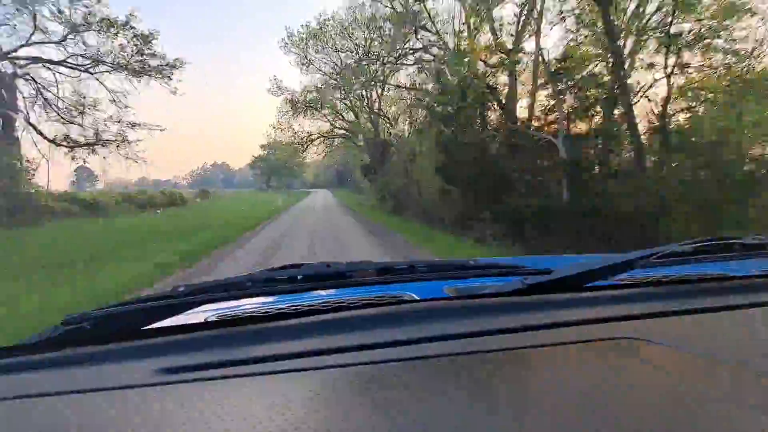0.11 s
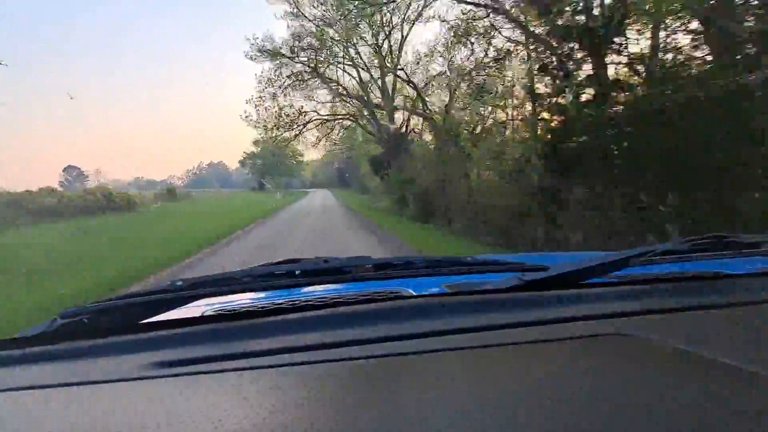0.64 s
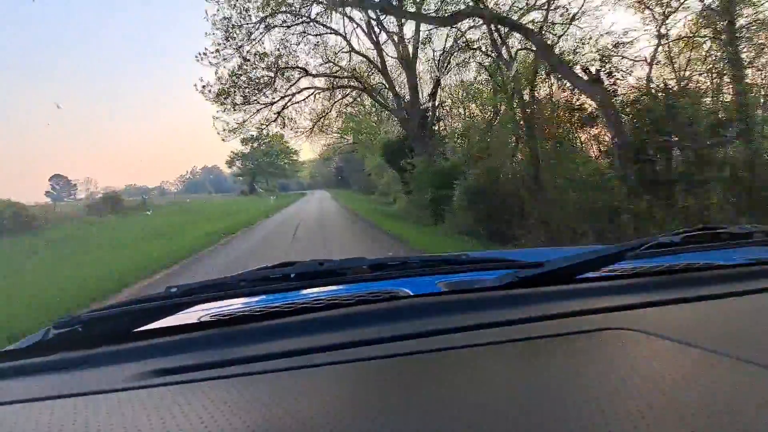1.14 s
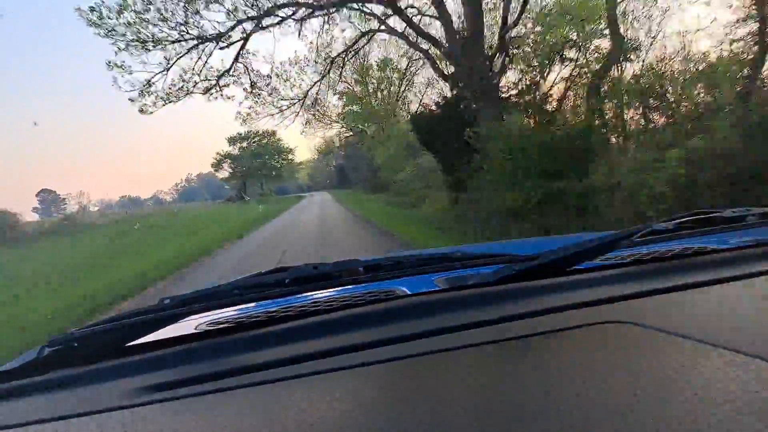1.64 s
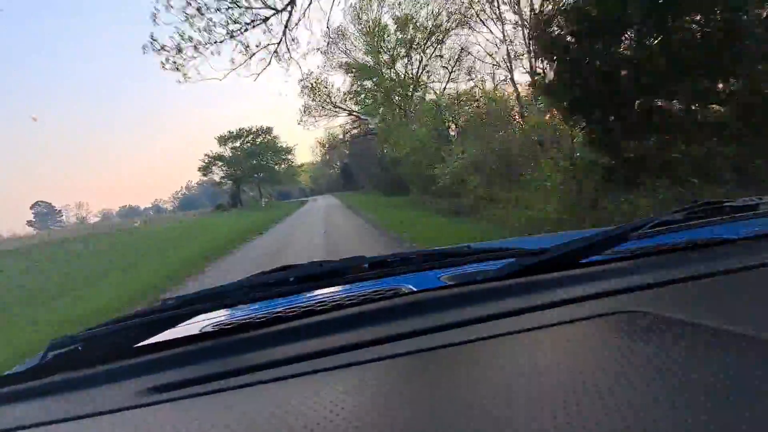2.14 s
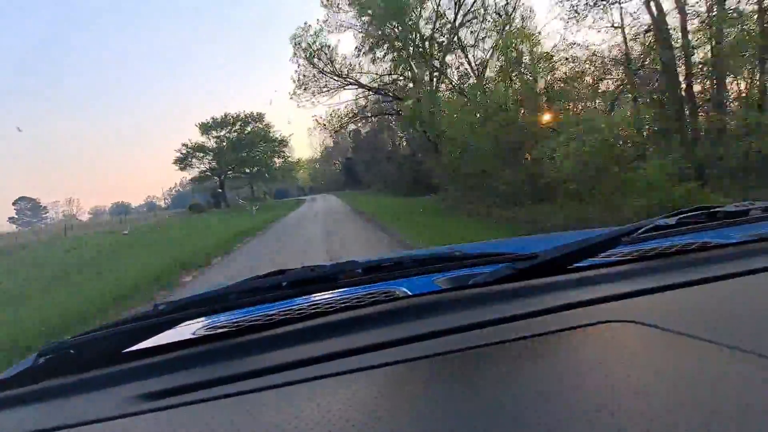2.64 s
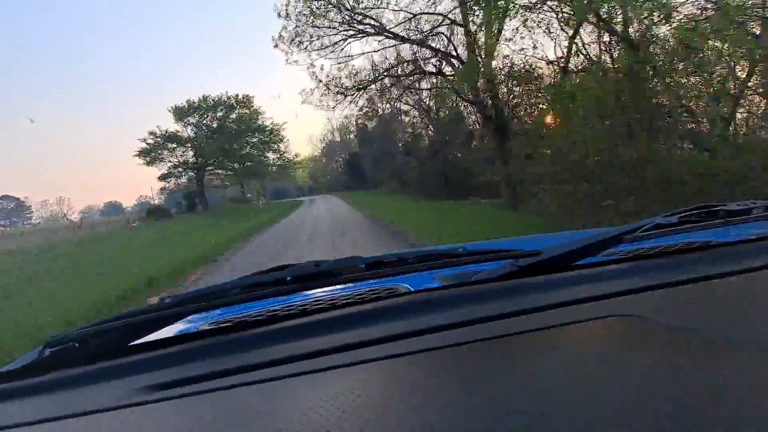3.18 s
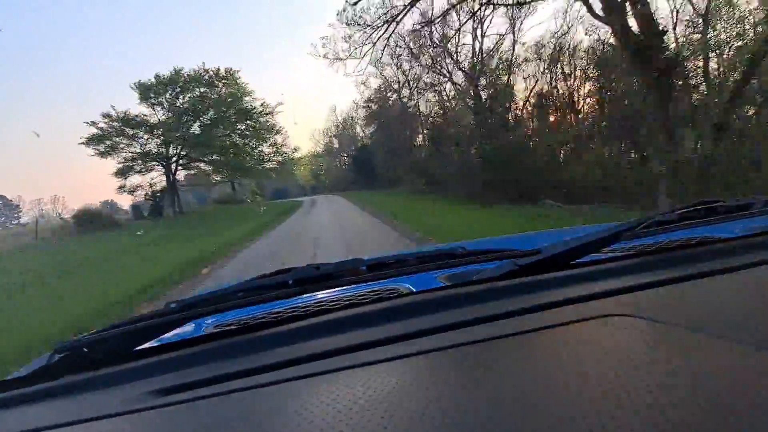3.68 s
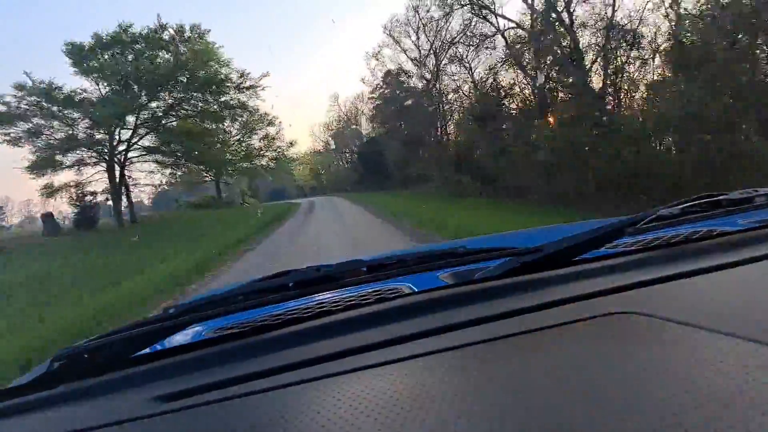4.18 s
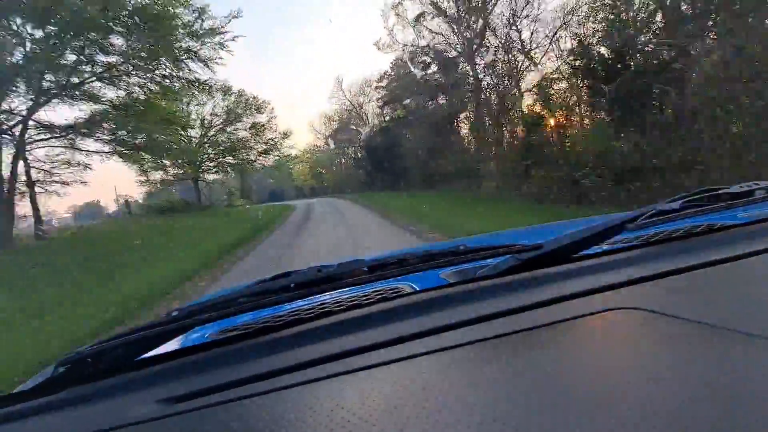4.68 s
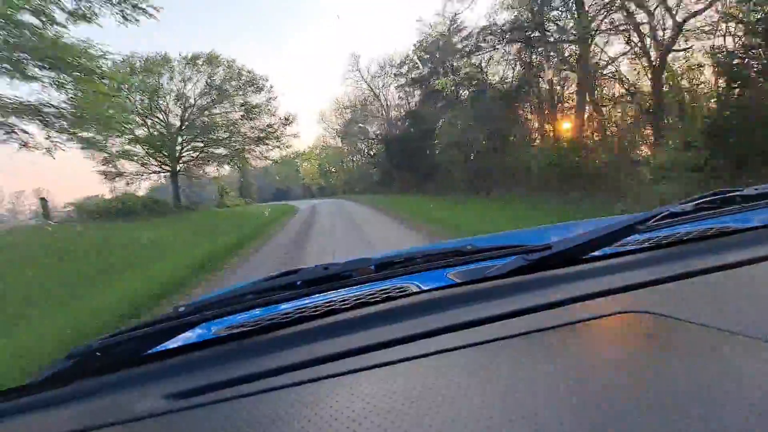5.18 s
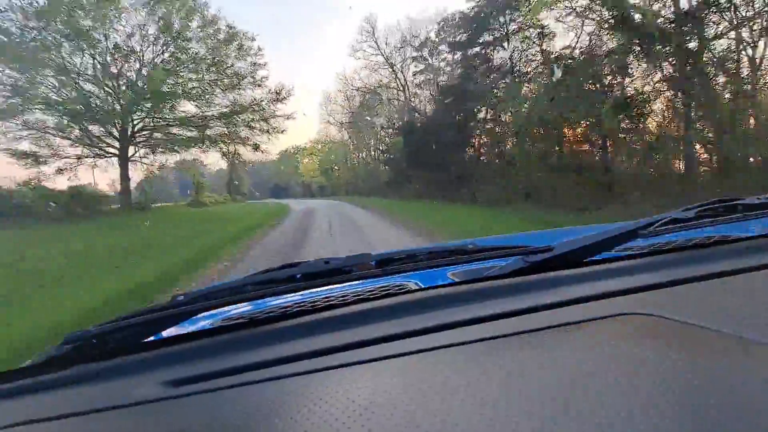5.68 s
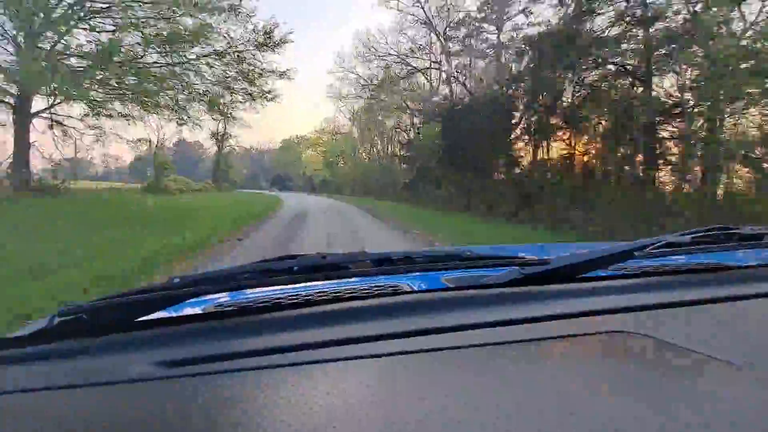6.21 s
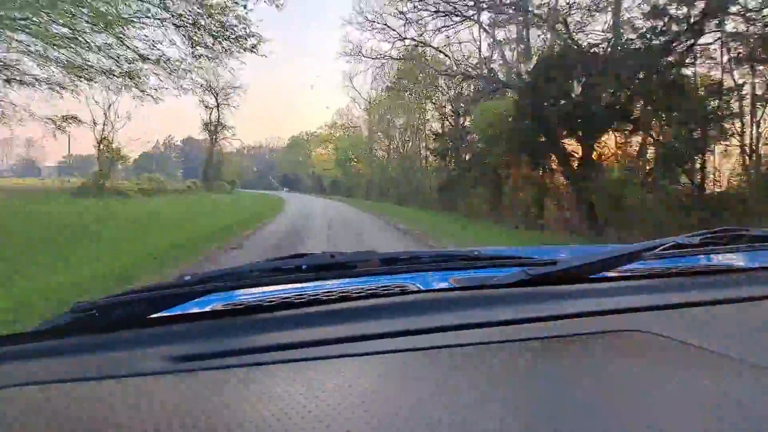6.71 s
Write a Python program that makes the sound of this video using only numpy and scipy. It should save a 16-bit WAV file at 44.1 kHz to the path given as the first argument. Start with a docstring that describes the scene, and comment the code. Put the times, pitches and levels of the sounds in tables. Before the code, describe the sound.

Heard from the dashboard inside a vehicle on a country road: a thick low rumble and uneven deep boom dominate throughout, with muted panel drumming and tyre roar. The engine hums for the first three and a half seconds, drops out while coasting, then returns near the end. Small dry ticks and faint rustles from loose trim come in irregular clusters, over barely audible hiss.

```python
"""Dashboard of a vehicle on a country road, heard by two microphones facing the noise of the cab.
The road makes a low rumble, panel drumming and tyre roar strongest near 790 Hz, all shaped noise; a low boom near
50 Hz is drawn as one sine with uneven pitch and level. The engine hums in two pulls, as sines at multiples of its
crank speed. Loose trim rustles as bursts of noise and ticks as struck resonances. Steady faint hiss and a thin
whine lie beneath."""
import sys
import numpy as np
from scipy import signal
from scipy.fft import rfft, irfft, next_fast_len
from scipy.io import wavfile
from scipy.ndimage import uniform_filter1d

SR = 44100
rng = np.random.default_rng(int(sys.argv[2]) if len(sys.argv) > 2 else 0)


def volts(x):
    """Linear amplitude factor 10**(x/20) for a level x in dB, scalar or array-like."""
    e = np.asarray(x, float) / 20
    return 10 ** e


def inscribe(sig):
    """Save sig as 16-bit PCM at rate SR to the path in sys.argv[1].

    A 1-D sig is mono; a 2-D sig holds one channel per row.
    Samples are clipped to [-1, 1] before scaling.
    """
    pcm = np.round(np.clip(np.atleast_2d(sig).T, -1, 1) * 32767)
    wavfile.write(sys.argv[1], SR, pcm.astype(np.int16))


N = 301194   # samples, about 6.83 s
SIZE = next_fast_len(N + SR // 2)   # FFT length, with room for a quarter second of padding at each end
BIN_HZ = np.maximum(np.arange(SIZE // 2 + 1) * SR / SIZE, 1)

# Spectrum shape of the dull trim noise. Each row: frequency in Hz, relative density in dB per Hz.
TRIM_LOW = [(900, -27.5), (1500, 4.5), (2200, -1.5), (3300, -4.5), (5000, -11), (6000, -33.5)]
# Spectrum shape of the bright trim noise. Each row: frequency in Hz, relative density in dB per Hz.
TRIM_HIGH = [(4000, -12.5), (5200, -1.5), (9800, -2), (10500, -15), (11800, -9.5), (13500, -6.5),
             (14500, -5.5)]


def rms_one(x):
    """Scale to unit rms."""
    return x / np.sqrt(np.mean(x ** 2) + 1e-20)


def in_time(rows):
    """Columns of a curve table, first column in seconds, read at every sample."""
    s, *columns = np.transpose(rows)
    return [np.interp(np.arange(N) / SR, s, c) for c in columns]


def at_bins(points):
    """A (Hz, value) table read on a log axis at every FFT bin."""
    hz, value = np.transpose(points)
    return np.interp(np.log(BIN_HZ), np.log(hz), value)


def coloured(x, spectrum):
    """Filter by a spectrum that falls away within an octave beyond each end."""
    below = (spectrum[0][0] / 2, -90)
    above = (spectrum[-1][0] * 2, -120)
    closed = [below] + list(spectrum) + [above]
    return irfft(rfft(x, SIZE) * volts(at_bins(closed)), SIZE)[..., :N]


def drift(rate):
    """Slow random wander of unit rms: noise through two equal poles at rate (Hz), run every 40 samples."""
    r = np.exp(-80 * np.pi * rate / SR)
    noise = rng.standard_normal(N // 40 + 2002)
    slow = signal.lfilter([1], [1, -2 * r, r * r], noise)[2000:]
    return np.interp(np.arange(N) / 40, np.arange(len(slow)), rms_one(slow))


def dying(x, seconds):
    """Let every impulse decay exponentially, to about a third in the given time."""
    return signal.lfilter([1], [1, -np.exp(-1 / (seconds * SR))], x)


def cab_noise(spectrum):
    """Stereo noise of unit rms whose left-right correlation depends on frequency in the cab."""
    # Each row: frequency in Hz, correlation of the two sides from -1 to 1.
    likeness = [(40, 0.93), (150, 1), (250, 0.82), (350, .5), (750, 0.47), (880, -0.26), (1300, -0.49),
                (2000, .3), (3000, 0), (14000, -0.049)]
    mid, side = rfft(rng.standard_normal((2, SIZE)))
    alike = np.clip(at_bins(likeness), -1, 1)
    pair = np.sqrt(1 + alike) * mid + np.sqrt(1 - alike) * side * [[1], [-1]]
    return rms_one(coloured(irfft(pair, SIZE), spectrum))


def engine():
    """Sines at multiples of the crank speed, each wavering as firings differ; silent while coasting."""
    # Two pulls. Each row: time in seconds, crank turns per second, base level in dB,
    # unevenness between cylinders in dB.
    pulls = [
        [(0.0, 35.9, -33.5, 11.5), (0.53, 37.1, -26.5, -1), (1.3, 37.5, -30, 0), (1.68, 38.1, -27.5, -8.5),
         (1.94, 36.8, -28.5, -2.5), (2.11, 37.4, -32, -1), (2.87, 37.4, -32, -5), (3.4, 35.5, -43, 7)],
        [(6.1, 27.3, -38.5, -7), (6.388, 29.3, -22.5, -2.5), (6.468, 35, -34, -17), (6.83, 30.8, -26.5, -6.5)],
    ]
    # Each row: multiple of crank speed, level relative to the base in dB.
    orders = [(2, 5), (3, -0.5), (4, 1.5), (5, -20), (6, -16)]
    firing_order = 4
    out = np.zeros(N)
    for pull in pulls:
        turns, load_db, uneven_db = in_time(pull)
        start, end = pull[0][0], pull[-1][0]
        pulling, = in_time([(start - 0.1, 0), (start, 1), (end, 1), (end + 0.17, 0)])
        angle = 2 * np.pi * np.cumsum(turns) / SR
        for order, db in orders:
            phase = rng.uniform(0, 2 * np.pi) + 0.084 * drift(2.1)
            wave = np.sqrt(2) * np.sin(order * angle + phase)
            # unequal cylinders feed every order but the firing order
            level_db = load_db + db + uneven_db * (order != firing_order)
            out += pulling * volts(level_db + 2.6 * drift(2.8)) * wave
    return out


def boom():
    """Low boom near 50 Hz, drawn as one sine with uneven pitch and level."""
    # Each row: time in seconds, centre of the uneven pitch in Hz, centre of the uneven level in dB.
    boom_curve = [(0, 48.64, -21), (.5, 43.1, -25.5), (1.2, 44.95, -23.5), (1.8, 46.15, -26),
                  (2.2, 52.88, -18), (3.0, 54.13, -25), (3.7, 48.07, -25.5), (4.3, 54, -21),
                  (4.8, 48.87, -22.5), (5.3, 50.98, -22.5), (5.75, 47, -16), (6.15, 45.7, -27.5),
                  (6.4, 52, -23), (6.83, 45, -26.5)]
    pitch_spread_hz, pitch_rate_hz = 2.5, 3.0
    level_spread_db, level_rate_hz = 2.5, 4.1
    hz, level_db = in_time(boom_curve)
    hz = hz + pitch_spread_hz * drift(pitch_rate_hz)
    angle = 2 * np.pi * np.cumsum(hz) / SR + 0.73 * drift(4.6)
    return volts(level_db + level_spread_db * drift(level_rate_hz)) * np.sqrt(2) * np.sin(angle)


def shaking():
    """Gains of the dull and the bright trim noise: a bed, and bursts that rise, hold and fall."""
    # Faint rustle between bursts. Each row: time in seconds, dull level in dB.
    rustle_bed = [(0, -72), (1.5, -70), (2.7, -75), (3.5, -73), (4.5, -76), (5.5, -75), (6.83, -83)]
    # Each row: start of the hold in seconds, hold in seconds, dull level in dB, bright over dull in dB.
    bursts = [(0.0, 0.17, -70, -3), (.64, .1, -67, -12.5), (0.786, 0.069, -65, -4), (1.018, .05, -68.5, -4),
              (1.184, 0.091, -67.5, 2), (1.697, 0.087, -66.5, -4.5), (1.824, 0.054, -62.5, -2.5),
              (1.928, 0.091, -64.5, -8), (2.205, 0.045, -60.5, -3.5), (2.398, 0.089, -60, 0),
              (2.483, 0.13, -64, -9), (3.18, 0.076, -75, -11), (3.678, .03, -76, 1.5),
              (3.762, .1, -69.5, -6.5), (3.974, 0.1, -63, -6.5), (4.147, 0.094, -62, -4.5),
              (4.39, .04, -68.5, -7), (4.689, 0.098, -66.5, -6), (5.032, .06, -71.5, -3.5),
              (5.36, .06, -73, -4.5)]
    bed_bright_db = -10.5   # bright over dull
    rise_db_per_s, fall_db_per_s = 152, 61.5
    bed_db, = in_time(rustle_bed)
    t = np.arange(N) / SR
    dull_power = volts(bed_db) ** 2
    bright_power = volts(bed_db + bed_bright_db) ** 2
    for start, hold, db, bright_db in bursts:
        rise_db = rise_db_per_s * np.maximum(start - t, 0)
        fall_db = fall_db_per_s * np.maximum(t - start - hold, 0)
        power = volts(db - rise_db - fall_db) ** 2
        dull_power = dull_power + power
        bright_power = bright_power + power * volts(bright_db) ** 2
    return np.sqrt(dull_power), np.sqrt(bright_power)


def road(dull):
    """Floor rumble, panel drumming and tyre roar: noise bands that swell with the road's roughness."""
    # Each row: time in seconds, roughness of the road in dB.
    roughness = [(0, -4), (.6, 0.5), (1.3, -1.5), (2, 1.5), (2.5, -2), (3.2, -3.5), (3.7, -2.5), (4.1, 2),
                 (4.4, 1), (4.8, 1.5), (5.2, 1), (5.75, -0.5), (6.1, -1), (6.45, -1.5), (6.83, 0)]
    # Spectrum shapes of the three. Each row: frequency in Hz, relative density in dB per Hz.
    rumble_shape = [(20, -16), (30, -15.5), (39, -3.5), (60, -2.5), (68, 1), (90, -2), (126, -4.5),
                    (144, -9), (168, -21), (200, -22.5)]
    drumming_shape = [(94, -35), (160, -7), (178, -10), (231, -7.5), (362, -19), (500, -27.5), (650, -59.5),
                      (1100, -120)]
    roar_shape = [(250, -48), (420, -9.5), (441, -14.5), (562, -11), (595, -13), (630, -7), (791, -2),
                  (1090, -19), (1270, -21), (2300, -51.5), (2990, -84), (5060, -120)]
    rumble_db, drumming_db, roar_db = -19.5, -34, -41.5   # where roughness is 0 dB, before the swings below
    drumming_follows, roar_follows = 0.45, 0.3   # share of the roughness swing
    # drumming and roar rise a little when the trim rustles: share of the rustle's slow swing
    drumming_shakes, roar_shakes = 0.13, 0.1
    road_db, = in_time(roughness)
    rustle_db = uniform_filter1d(20 * np.log10(dull), size=SR // 3)
    rustle_db = rustle_db - rustle_db.mean()
    lumps = drift(9.1)   # shared by rumble and drumming
    rumble_level = rumble_db + road_db + 0.51 * lumps
    drumming_level = drumming_db + drumming_follows * road_db + drumming_shakes * rustle_db
    drumming_level = drumming_level + 0.28 * lumps + 0.28 * drift(34.0)
    roar_level = roar_db + roar_follows * road_db + roar_shakes * rustle_db + 0.73 * drift(45.0)
    rumble = volts(rumble_level) * cab_noise(rumble_shape)
    drumming = volts(drumming_level) * cab_noise(drumming_shape)
    return rumble + drumming + volts(roar_level) * cab_noise(roar_shape)


def rustle(dull, bright):
    """Dense tiny contacts in the trim: noise that jumps up at each and soon dies back to a steady part."""
    contacts_per_s, fade_s = 200.0, 0.018
    strength_db = np.minimum(rng.exponential(1, N), 4)
    contacts = (rng.random(N) < contacts_per_s / SR) * volts(strength_db)
    grain = rms_one(3.5 + dying(contacts, fade_s))
    low = volts(1.5) * cab_noise(TRIM_LOW)
    return grain * (dull * low + bright * cab_noise(TRIM_HIGH))


def electronics():
    """Steady faint hiss of shaped noise, with one thin sine whine."""
    # Each row: frequency in Hz, level in dB.
    whine_tones = [(11321, -102)]
    # Spectrum shape of the hiss. Each row: frequency in Hz, relative density in dB per Hz.
    hiss_shape = [(2000, -6.5), (2300, -5.5), (2700, 0.5), (3100, -3.5), (3800, -13.5), (5000, -11.5),
                  (6500, -18.5), (7500, -11), (9800, -11.5), (10500, -17.5), (11500, -14), (11800, -29),
                  (13000, -30.5), (14500, -22)]
    whine = np.zeros(N)
    for hz, db in whine_tones:
        whine += volts(db) * np.sqrt(2) * np.sin(2 * np.pi * hz * np.arange(N) / SR)
    return volts(-75) * cab_noise(hiss_shape) + whine


def ticks(dull):
    """Knocks ring the trim modes at chance strengths, with a broad snap and a short bright crack;
    lesser knocks come at random, their strength following the dull rustle, and only ring."""
    # Each row: time in seconds, strength of the knock in dB, strength of the treble crack in dB,
    # left over right in dB.
    knocks = [(0.839, -48.5, -66.5, 0), (1.048, -51.5, -74, 2), (1.1804, -51, -58, -4),
              (1.2807, -64, -64, -14), (1.7038, -49, -60, 0), (1.811, -41, -49.5, 0),
              (1.8693, -56.5, -59.5, -6.5), (2.115, -53, -70, 3), (2.2485, -49, -52.5, -7),
              (2.419, -47, -54, -6), (2.4995, -57, -58, -8), (2.539, -51.5, -61, 0), (2.63, -53, -69.5, 5),
              (2.9957, -56.5, -71, -3.5), (3.6894, -64, -63.5, -5), (3.845, -54.5, -67, -10),
              (3.969, -58, -51, 1), (4.0057, -52, -60, 0), (4.1132, -47.5, -69, 0), (4.1587, -68, -54.5, 0),
              (4.1854, -49, -67, 1), (4.227, -55, -63, -0.5), (4.6951, -53, -83, -1),
              (4.7521, -41.5, -59, 0.5), (4.8803, -57, -69.5, -4), (5.0635, -57, -74, -1),
              (5.1426, -55, -78.5, -2), (5.3589, -61, -63.5, 1)]
    # Each row: frequency in Hz, share of the knock in dB, time to fall 60 dB in seconds.
    modes = [(1270, -5, 0.027), (1797, -3.5, 0.046), (2027, -6.5, 0.049), (2540, -6.5, 0.027),
             (3120, -9.5, 0.017), (3370, -9.5, 0.0085), (4420, -13.5, 0.0071)]
    lesser_per_s, lesser_db = 45.0, 9.5   # strength over the dull rustle gain, before chance
    chatter_s, crack_s, snap_s = 0.0031, 0.0088, 0.019   # time to die to a third
    snap_db = -9   # relative to the knock
    s, knock_db, crack_db, pan_db = np.transpose(knocks)
    at = np.round(s * SR).astype(int)
    sides = volts(np.outer([.5, -.5], pan_db))
    chance_db = rng.normal(0, 2.5, (len(at), len(modes)))
    lesser = (rng.random(N) < lesser_per_s / SR) * dull * volts(lesser_db)
    rough = rng.standard_normal((2, N))

    ringing = np.zeros((2, N))
    for k, (hz, db, t60) in enumerate(modes):
        clicks = volts(db) * lesser * rng.standard_normal((2, N)) + 1e-18
        # every other mode reaches the two sides in opposite phase
        clicks[:, at] = sides * volts(knock_db + db + chance_db[:, k]) * [[1], [(-1) ** k]]
        # a knock is a few ms of rough contact
        clicks = 0.1 * clicks + 0.091 * dying(clicks, chatter_s) * rough
        r, w = volts(-60 / (t60 * SR)), 2 * np.pi * hz / SR
        ringing += signal.lfilter([0, np.sin(w)], [1, -2 * r * np.cos(w), r * r], clicks)

    cracks = np.full((2, N), 1e-18)
    cracks[:, at] = sides * volts(crack_db)
    crack = dying(cracks, crack_s) * cab_noise(TRIM_HIGH)
    thuds = np.full((2, N), 1e-18)
    thuds[:, at] = sides * volts(knock_db + snap_db)
    snap = dying(thuds, snap_s) * cab_noise(TRIM_LOW)
    return ringing + crack + snap


def scene():
    """Everything that reaches the two microphones."""
    dull, bright = shaking()
    return engine() + boom() + road(dull) + rustle(dull, bright) + electronics() + ticks(dull)


def low_pass(x):
    """Removes everything above the highest recorded frequency."""
    return signal.sosfilt(signal.butter(12, 15490, fs=SR, output="sos"), x)


def record(dry):
    """The microphones differ in colour; a high-pass on the left weakens its lows and leads their phase."""
    # Each row: frequency in Hz, left over right in dB.
    left_over_right = [(200, 0.5), (350, 1.5), (520, -4), (730, 0), (900, -3.5), (1300, -5), (2100, -0.5),
                       (3000, -7), (7000, 1), (12500, -2.5)]
    left_cut_hz, top_cut_hz = 90, 14700   # the top is 50 dB down from its cut upwards
    tilt = volts(np.outer([.5, -.5], at_bins(left_over_right)))
    edge = SR // 4
    padded = np.pad(dry, [(0, 0), (edge, edge)], "reflect", reflect_type="odd")
    left, right = irfft(rfft(padded, SIZE) * tilt, SIZE)
    left = signal.lfilter(*signal.butter(1, left_cut_hz, "high", fs=SR), left)
    top_cut = signal.cheby2(24, 50, top_cut_hz, fs=SR, output="sos")
    mix = signal.sosfilt(top_cut, [left, right])[:, edge:edge + N]
    return low_pass(mix)


dry = scene()
out = record(dry)
inscribe(out)
```